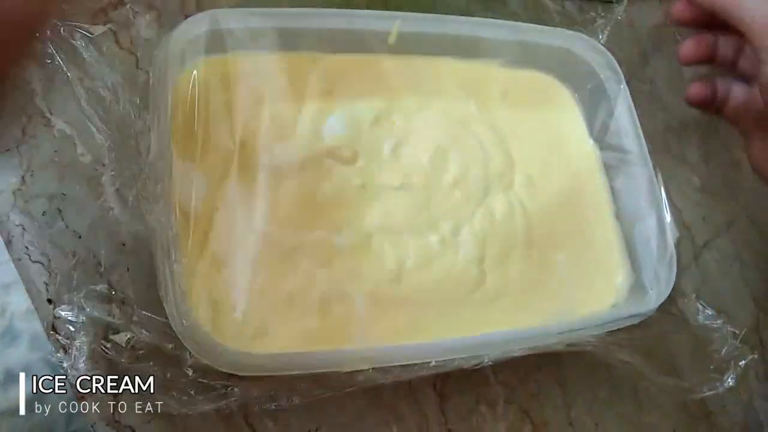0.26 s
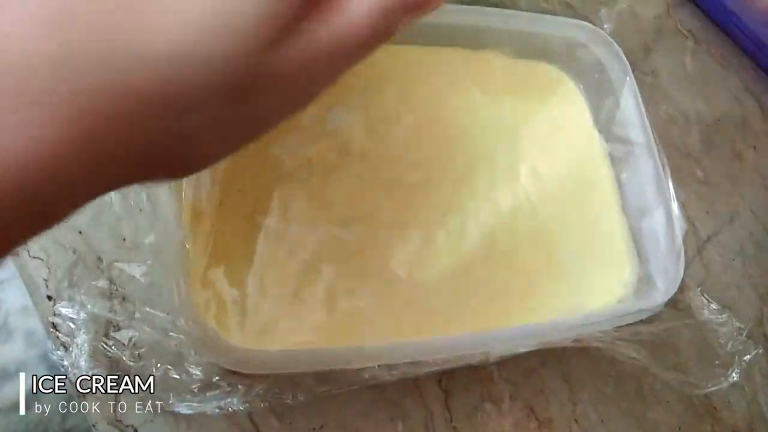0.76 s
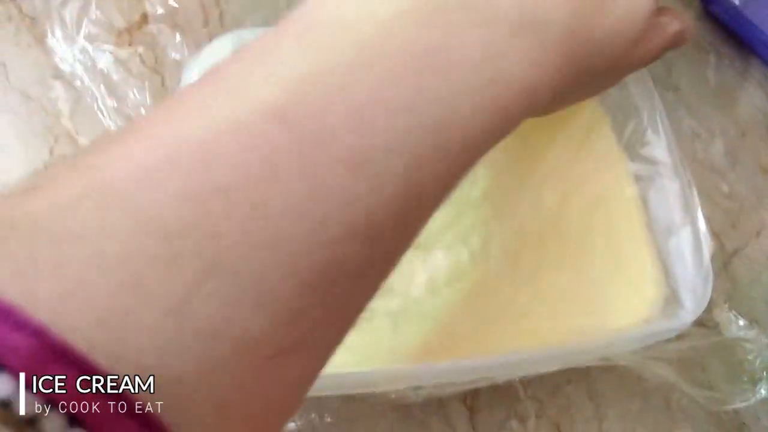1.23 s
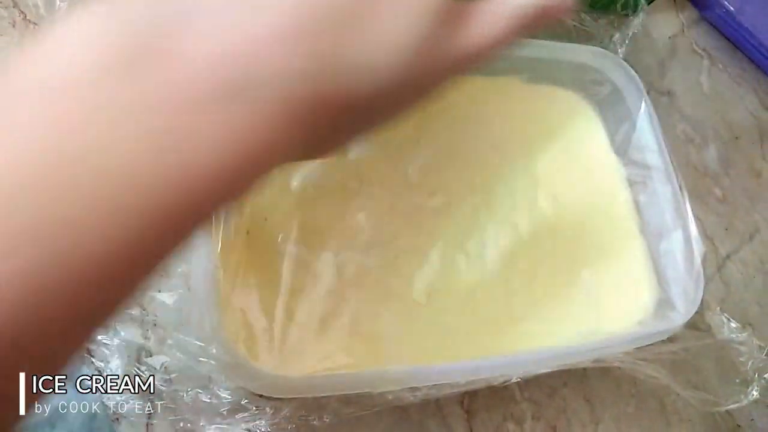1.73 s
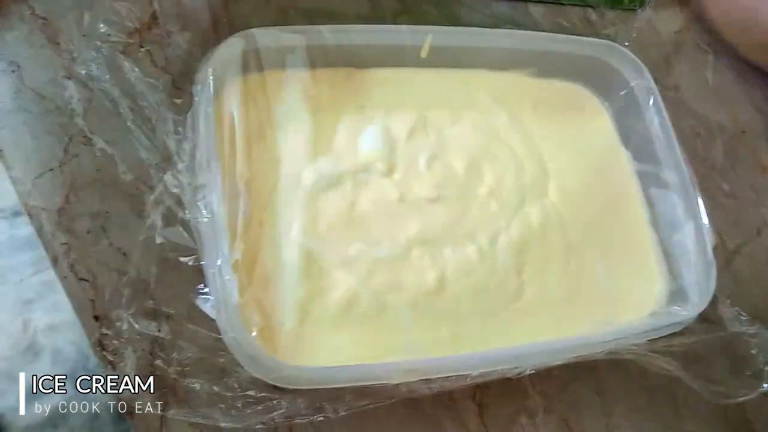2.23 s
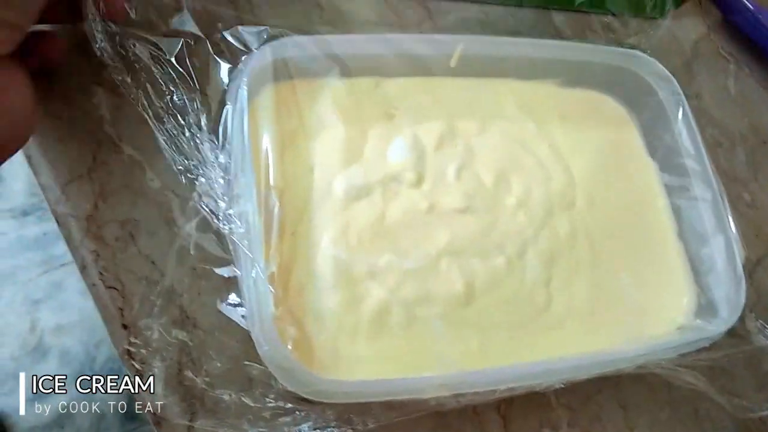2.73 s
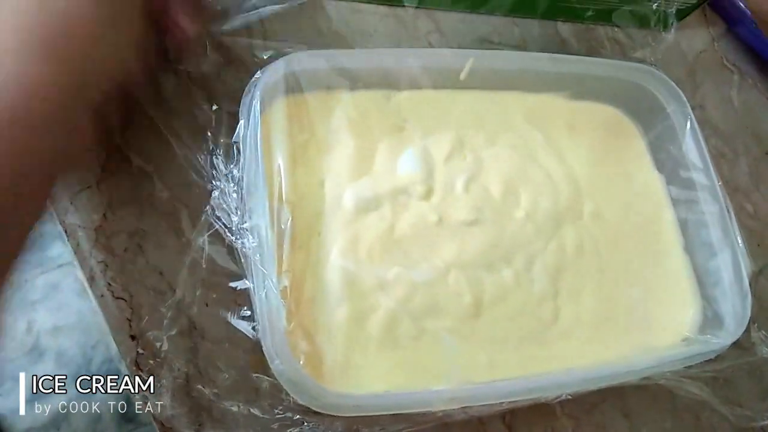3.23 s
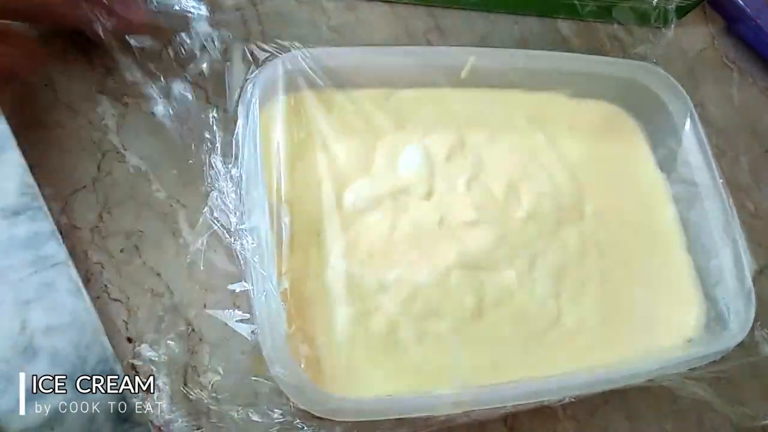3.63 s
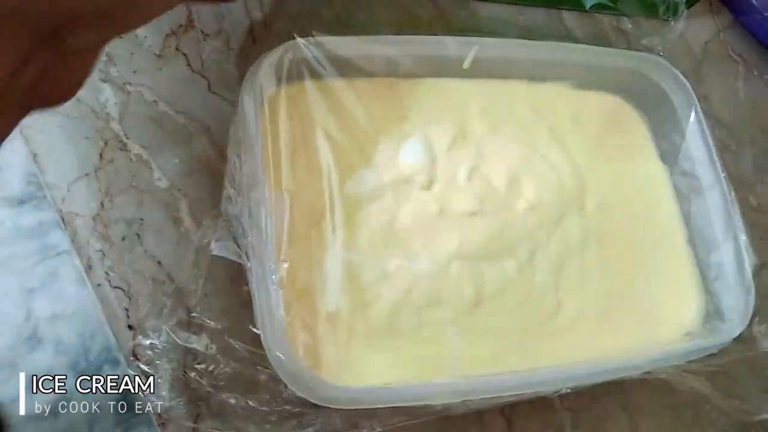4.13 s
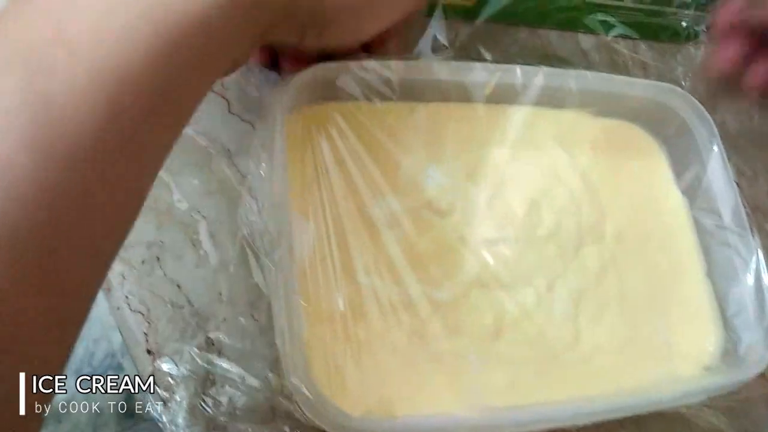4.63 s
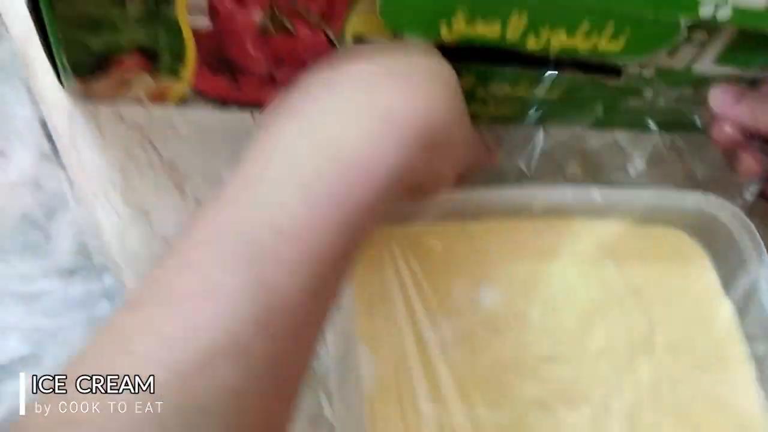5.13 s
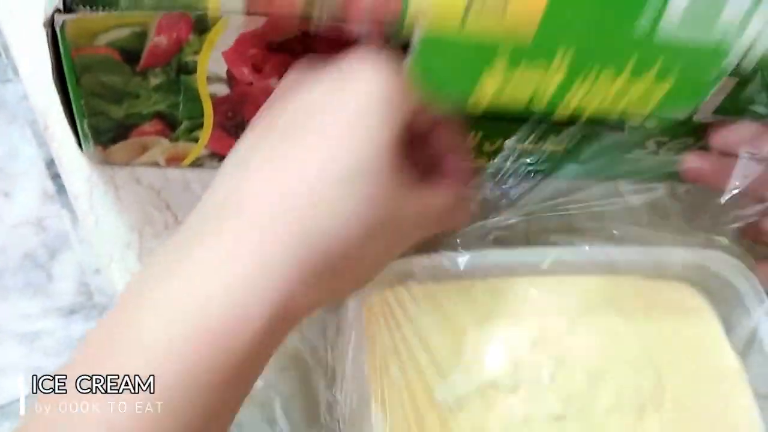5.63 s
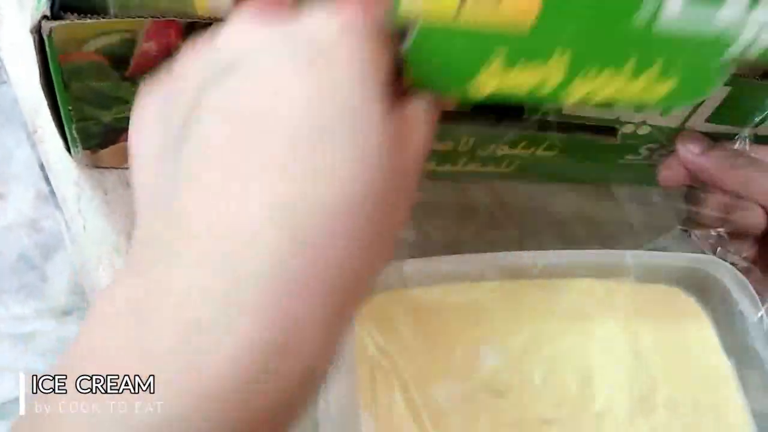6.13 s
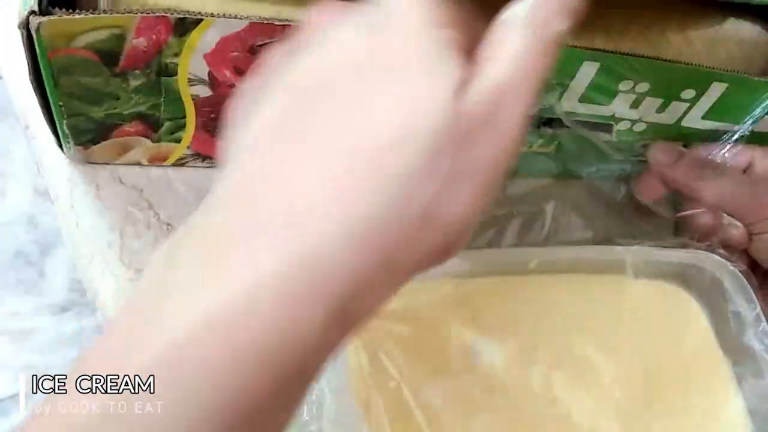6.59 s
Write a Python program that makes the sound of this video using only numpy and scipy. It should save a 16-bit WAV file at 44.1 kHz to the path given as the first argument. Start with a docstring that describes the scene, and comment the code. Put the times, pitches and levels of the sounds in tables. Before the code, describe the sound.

A close microphone in a small, hard kitchen, over faint steady air noise. Small film rustles at 0.2 seconds, then near quiet until a soft bump and tap on a plastic tub's rim at 0.9. Light bumps and crumples around 1.25 to 1.4 lead into a long pull from 1.55 to 2.45: a stuttering, drum-like stretch around one kilohertz, wavering in pitch, with pops. A tub tap and crumple at 2.65, faint tugs, then sharp bright snaps at 3.4 and a jolting pop at 3.84. Another pull runs from 4.07 to 4.5, with dull double bumps at 4.77. Snaps and stretching return from 5.3 to 5.75. The busiest, loudest crackling comes at 6.0 to 6.12, ending in a low pop and hollow cardboard knock. A further pull with thin squeaks follows until 6.6, and a brief strong tug at 6.8.

```python
"""Cling film is pulled off its roll and stretched over a plastic tub on a stone kitchen counter.
Stick-slip makes the peeling film let go in tiny slips, which excite the taut sheet like a drum and fizz in
its creases. Folds snap and crumple as filtered impulses and noise; the film squeaks by friction.
Bumps, taps and a knock ring decaying modes of tub, counter and cardboard box.
A small hard room answers with decaying random reflections, over faint steady air noise."""
import sys
import numpy as np
from scipy import signal
from scipy.fft import rfft, irfft
from scipy.io import wavfile

SR = 44100
rng = np.random.default_rng(int(sys.argv[2]) if len(sys.argv) > 2 else 0)


def to_wav(sig):
    """Store sig (one row per channel, or 1-D mono) as 16-bit WAV at the path in sys.argv[1].

    Samples outside -1..1 are clipped; the rate is SR.
    """
    pcm = np.clip(np.atleast_2d(sig), -1, 1) * 32767
    pcm = np.round(pcm).astype(np.int16)
    wavfile.write(sys.argv[1], SR, pcm.T)  # frames by channels


N = 302526
TIME = np.arange(N) / SR
# Levels in the tables are relative: the functions that play them add their own mixing gains.

COARSE_DB, FINE_DB = -3.5, 0.5   # large and small creases, against the creases' level
SHEET_DB, BOX_DB = -0.47, -2   # gain of the sheet and of the box around the roll
# spectrum of large creases: hz, density_db
LARGE_CREASE_COLOUR = [(1000, -13.5), (2200, 6.5), (2800, -1.5), (3800, -4), (5200, 5), (6400, -12.5),
                       (7500, 2.5), (10000, -34)]
# spectrum of small creases: hz, density_db
SMALL_CREASE_COLOUR = [(3000, -38), (5500, -9), (7000, -5), (9200, -1), (11000, -6), (14000, -7.5),
                       (16000, -34)]
# spectrum of the hollow box and tub: hz, density_db
HOLLOW_COLOUR = [(40, -7), (70, -2.5), (120, -16), (163, -2), (195, -30.5), (250, -3), (300, 3), (365, -24),
                 (430, -8.5), (550, -8), (700, -37), (1500, -31)]


def peeling():
    """Stick-slip friction: the same uneven grip drives the sheet, its creases and the box around the roll."""
    grip_db = 1.34 * drift(130) + 3.0 * drift(35)
    sheet_gain, crease_gain, box_gain = pull_gain(axis=1), pull_gain(axis=2), pull_gain(axis=3)
    sheet = stretched_sheet() + singing()
    drum = sheet * sheet_gain * from_db(0.62 * grip_db + SHEET_DB)
    coarse = creases(LARGE_CREASE_COLOUR) * crease_gain * from_db(0.62 * grip_db + COARSE_DB)
    fine = creases(SMALL_CREASE_COLOUR) * crease_gain * from_db(0.5 * grip_db + FINE_DB)
    box_force = slips(per_s=900, spread_db=4.0) * box_gain * from_db(0.69 * grip_db + BOX_DB)
    # too light a force to shake the counter
    bass_cut = signal.butter(1, 110, "high", fs=SR, output="sos")
    box = signal.sosfilt(bass_cut, colour(box_force, HOLLOW_COLOUR))
    return drum + coarse + fine + box


GRAB_S, LET_GO_S = 0.0042, 0.013   # a pull starts quickly and is let go more slowly
TUG_ARCH_DB, TUG_FIZZ_ARCH_DB = 2, 7.0   # rise to halfway through a tug: of the sheet, of its creases
TUG_BOX_DB = -15.0   # the box in a tug, against the sheet
# long pulls of film off the roll, each a curve of points: time_s, sheet_db, creases_db, box_db
PULL_CURVES = [
    [(1.55, -45.5, -70, -48.5), (1.624, -46.5, -58, -52), (1.642, -41, -57, -45), (1.824, -44, -56, -60),
     (1.878, -41, -52.5, -49.5), (2.13, -44, -60.5, -47), (2.294, -38.5, -59, -53),
     (2.448, -50.5, -64, -61), (2.47, -78, -106, -73)],
    [(4.07, -45.5, -65, -56.5), (4.13, -42.5, -59, -49.5), (4.172, -48.5, -59, -63), (4.194, -52, -55, -50),
     (4.2, -34.5, -51.5, -63), (4.25, -68, -55.5, -57), (4.28, -44, -60.5, -45.5),
     (4.428, -51.5, -56.5, -64), (4.55, -64.5, -66.5, -73)],
    [(5.35, -64, -58, -65), (5.366, -57, -54, -72), (5.524, -61, -54.5, -74), (5.55, -61, -51, -91),
     (5.602, -38, -46.5, -56), (5.648, -46.5, -52.5, -68), (5.7, -61.5, -57, -78), (5.762, -63, -56, -76),
     (5.77, -62, -54.5, -64)],
    [(6.17, -54, -62.5, -55), (6.264, -55, -55, -73), (6.322, -49, -54.5, -72), (6.342, -53.5, -58, -43),
     (6.356, -44, -52, -63), (6.374, -52, -50, -78), (6.414, -67, -64, -71), (6.426, -58, -54, -67),
     (6.44, -62, -83, -78)],
]
# short tugs at the film: start_s, length_s, sheet_db, creases_db
SHORT_TUGS = [(2.849, 0.095, -76, -80), (3.036, 0.057, -55, -73.5), (3.113, 0.25, -61.5, -74),
              (3.499, 0.082, -66.5, -79), (3.693, 0.27, -67, -60.5), (3.871, 0.11, -60, -67),
              (4.571, 0.21, -59.5, -59), (4.99, 0.088, -58, -60), (5.188, 0.12, -66, -68),
              (5.789, 0.089, -47.5, -54), (5.905, 0.26, -56.5, -55.5), (6.501, .14, -53.5, -62),
              (6.786, 0.1, -35.5, -53)]


def pull_gain(axis):
    """Force envelope of sheet (1), creases (2) or box (3): pulls follow their curves, tugs an arch."""
    pulls = [np.array(pull) for pull in PULL_CURVES]
    arch = np.array([-0.5, 0.5, -0.5])
    for s, length, sheet_db, creases_db in SHORT_TUGS:
        times = s + length * np.array([0, 0.5, 1])
        sheet = sheet_db + TUG_ARCH_DB * arch
        folds = creases_db + TUG_FIZZ_ARCH_DB * arch
        pulls.append(np.transpose([times, sheet, folds, sheet + TUG_BOX_DB]))
    out = np.zeros(N)
    for pull in pulls:
        # distance before the start or after the end, in time constants
        outside = np.maximum((pull[0, 0] - TIME) / GRAB_S, (TIME - pull[-1, 0]) / LET_GO_S)
        near = outside < 10
        level = from_db(np.interp(TIME[near], pull[:, 0], pull[:, axis]))
        out[near] = np.maximum(out[near], level * np.exp(-np.maximum(outside[near], 0)))
    return out


SHEET_HZ = 1100   # usual pitch of the sheet, to which its spectrum and modes refer
SLACK_HZ, TAUT_HZ, TIGHTEN_S = 975.6, 1201, 0.18


def tension():
    """Tension raises pitch: slack at each new grip, the sheet tightens exponentially."""
    grips = np.sort([0] + [pull[0][0] for pull in PULL_CURVES] + [tug[0] for tug in SHORT_TUGS])
    held = TIME - grips[np.searchsorted(grips, TIME, "right") - 1]
    pitch_hz = TAUT_HZ + (SLACK_HZ - TAUT_HZ) * np.exp(-held / TIGHTEN_S)
    return pitch_hz / SHEET_HZ


# spectrum of the taut sheet at its usual pitch: hz, density_db
SHEET_COLOUR = [(60, -56), (200, -42.5), (400, -16), (600, -16), (800, -1), (1030, 3.5), (1250, 4),
                (1450, -11.5), (1600, -4), (1950, -15), (2300, -22), (2750, -20.5), (3600, -30.5),
                (6000, -71)]


def sheet_at(pitch_hz):
    """Tension scaling: the whole spectrum of the sheet shifts with its pitch."""
    return np.array(SHEET_COLOUR) * [pitch_hz / SHEET_HZ, 1]


# drum modes of the stretched sheet at its usual pitch: hz, level_db, t60_s
DRUM_MODES = [(568.2, -0.5, 0.15), (675.7, -2, 0.17), (855, -57, 0.17), (894, 0, 0.066), (1034, 6, 0.19),
              (1194, -3, 0.37), (1310, -15, 0.12), (1496, -7.5, 0.48), (1578, -31, 0.11)]


def stretched_sheet():
    """Membrane resonance: slips drum on the sheet, whose resonances all glide with its tension."""
    drive = slips(per_s=2500, spread_db=1.0)
    modes = from_db(-8.0) * rms_one(ring(drive, DRUM_MODES))
    drum = rms_one(colour(drive, SHEET_COLOUR) + modes)
    return np.interp(np.cumsum(tension()) % N, np.arange(N), drum)


SING_S, SING_DB, SING_GLIDE = 0.14, -0.5, 0.069   # note length, level against its mode, most relative bend


def singing(count=70):
    """Mode locking: at random moments slips lock onto one sheet mode and give a brief wavering note."""
    out = np.zeros(N)
    pitch = tension() * (1 + 0.031 * drift(276))
    t = np.linspace(0, 1, int(SING_S * SR))   # share of the note
    for when, which, bend in rng.random((count, 3)):
        start = int(when * (N - len(t)))
        hz, db, t60 = DRUM_MODES[int(which * len(DRUM_MODES))]
        bend_factor = 1 + SING_GLIDE * (2 * bend - 1) * t
        note_hz = hz * pitch[start:start + len(t)] * bend_factor
        wave = np.sin(2 * np.pi * np.cumsum(note_hz) / SR)
        add(out, start / SR, from_db(db + SING_DB) * np.hanning(len(t)) * wave)
    return out


def creases(spectrum, wander=0.054):
    """Impulsive buckling: tiny flips and a few larger ticks, whose colour wanders as folds change size."""
    tiny = from_db(-4.0) * slips(per_s=11000, spread_db=5.5)
    ticks = from_db(-10.5) * slips(per_s=320, spread_db=5.0)
    speed = 1 + wander * drift(13)
    return glide(colour(tiny + ticks, spectrum), speed)


SNAP_SWELL_S, SNAP_DECAY_S = 0.0004, 0.0014   # flutter of a snap
# single creases snapping: start_s, peak_db, sheet_jolt_db
CREASE_SNAPS = [(0.2632, -42.5, -64), (2.8565, -52.5, -84), (2.8815, -54.5, -83), (2.9134, -55, -65),
                (3.1306, -50.5, -64), (3.3242, -39.5, -38), (3.3679, -38, -29), (3.382, -21, -29),
                (3.4491, -27, -29), (3.7796, -42, -54), (3.8373, -28, -16), (4.1937, -33.5, -42),
                (4.2253, -30.5, -40), (4.2388, -34, -45), (4.2744, -43, -34), (4.4121, -36.5, -37),
                (4.6417, -32, -50), (4.7333, -35, -54), (5.0152, -41, -63), (5.0621, -37.5, -36),
                (5.2081, -45, -50), (5.334, -25.5, -31.5), (5.7382, -38, -56), (5.7845, -41, -48),
                (5.8482, -36.5, -37), (5.9999, -28.5, -34), (6.006, -25.5, -35), (6.11, -26, -33),
                (6.5275, -39, -35.5)]
# spectrum of a snapping crease: hz, density_db
SNAP_COLOUR = [(1000, -60), (2200, -3), (2700, 2.5), (3800, -4.5), (5200, 1.5), (7000, 3), (9200, 6),
               (11000, 2.5), (14000, -2.5), (16000, -11.5)]


def snaps():
    """Snap-through buckling: a crease flips with one sharp spike, flutters briefly and jolts the sheet."""
    s, peak_db, sheet_db = np.transpose(CREASE_SNAPS)
    swell, decay = np.full(len(s), SNAP_SWELL_S), np.full(len(s), SNAP_DECAY_S)
    crest = s + 0.0013
    crack_flutter = rng.standard_normal(N) * bursts(crest, peak_db - 14.0, swell, decay)
    crack = blows(zip(crest, peak_db + 10.0)) + crack_flutter
    jolt_flutter = rng.standard_normal(N) * bursts(crest, sheet_db - 4.0, swell, decay)
    jolt = blows(zip(crest, sheet_db + 0.5)) + jolt_flutter
    return colour(crack, SNAP_COLOUR) + colour(jolt, SHEET_COLOUR)


# plucks of the taut sheet: start_s, peak_db, pitch_hz
SHEET_PLUCKS = [(1.388, -33, 1244), (1.671, -27, 1020), (2.214, -23, 1223), (2.297, -21.5, 1033),
                (3.386, -24, 852), (3.836, -28, 930), (4.071, -30.5, 922), (4.2, -22.5, 1236),
                (4.306, -28, 1180), (4.563, -30, 930), (4.64, -30.5, 1217), (4.941, -36.5, 1116),
                (5.024, -32.5, 947), (5.243, -41, 1015), (5.621, -22, 1568), (5.784, -28.5, 1026),
                (5.985, -27.5, 1110), (6.013, -21, 1150), (6.12, -14, 796), (6.501, -30, 880.5),
                (6.612, -33.5, 803)]


def plucks(size=2048):
    """Free vibration: the taut sheet is let go and pops with a slap and a few cycles of its pitch."""
    out, t = np.zeros(N), TIME[:size]
    envelope = np.exp(-t / 0.0064) * (1 - np.exp(-t / 0.00012))
    for s, db, hz in SHEET_PLUCKS:
        slap = from_db(3.5) * colour(signal.unit_impulse(size), sheet_at(hz))
        tone = from_db(-7.0) * np.cos(2 * np.pi * hz * t) * envelope
        add(out, s, from_db(db) * (slap + tone))
    return out


CRUMPLE_SWELL_S = 0.0072
# handfuls of folds crumpling: peak_s, peak_db, fizz_db, pitch_hz, decay_s
FOLD_CRUMPLES = [(0.164, -47, -58, 1110, 0.029), (0.26, -40.5, -56.5, 1000, 0.0043),
                 (1.235, -47.5, -69, 1040, 0.02), (1.283, -43.5, -55, 980, 0.027),
                 (1.378, -42.5, -65, 1070, 0.021), (1.436, -50, -61.5, 1190, .01),
                 (1.542, -38, -65, 1130, .01), (1.674, -37, -62, 1010, 0.022),
                 (2.652, -33.5, -46, 1145, 0.011), (3.385, -29.5, -36, 955, 0.013),
                 (3.401, -27, -54, 1320, 0.0087), (3.45, -33.5, -39.5, 740, 0.014),
                 (3.839, -33.5, -49, 1160, 0.0066), (4.568, -33, -53.5, 973, 0.025),
                 (4.734, -35.5, -42.5, 1095, 0.0031), (5.786, -29, -39, 1100, .006),
                 (6.011, -18, -28.5, 1130, 0.0094)]


def crumples(size=8192):
    """Avalanche of slips: many folds give way in quick succession, each handful at its own pitch."""
    folds, out = slips(per_s=4900, spread_db=7.0), np.zeros(N)
    s, peak_db, fizz_db, pitch_hz, decay = np.transpose(FOLD_CRUMPLES)
    swell = np.full(len(s), CRUMPLE_SWELL_S)
    for k, start in enumerate(s - 0.05):   # room for the swell
        drive = folds * bursts([s[k]], [peak_db[k] - 5.5], [swell[k]], [decay[k]])
        add(out, start, colour(drive[int(start * SR):][:size], sheet_at(pitch_hz[k])))
    fizz = folds * bursts(s, fizz_db - 5.0, swell, decay)
    return out + colour(fizz, SNAP_COLOUR)


# squeaks of the film dragging over the roll: peak_s, level_db, swell_s, decay_s
FILM_SQUEAKS = [(5.115, -54, 0.0013, 0.0086), (5.61, -58, 0.04, 0.047), (6.02, -58, 0.01, 0.06),
                (6.35, -55, 0.042, 0.022), (6.553, -52, 0.0066, 0.0057), (6.595, -46.5, 0.0019, 0.016),
                (6.616, -66, 0.0057, 0.0061)]
# resonances of a squeak: hz, level_db, t60_s
SQUEAK_RESONANCES = [(2432, 5.5, 0.042), (3250, 6.5, 0.058), (3700, -1, 0.021), (5230, -6.5, 0.09),
                     (6840, -7, .015), (9060, 8.5, 0.012)]


def squeaks():
    """Friction excitation: noise of uneven strength drives a few narrow, high resonances."""
    friction = rng.standard_normal(N) * from_db(2.7 * drift(119.56))
    return rms_one(ring(friction, SQUEAK_RESONANCES)) * bursts(*np.transpose(FILM_SQUEAKS))


# soft bumps on tub and box: start_s, peak_db, counter_boom_db, contact_s (limited to 0.0004-0.01 s)
SOFT_BUMPS = [(0.164, -52.5, -74, 0.001), (0.911, -32, -51, 0.0039), (1.229, -40.5, -53, 0.0031),
              (1.27, -28.5, -47, 0.0011), (2.633, -39, -60, 0.00041), (2.687, -30.5, -50, 0.0058),
              (3.047, -54, -81, 0.00048), (3.191, -45, -53.5, 0.0003), (3.382, -40.5, -69, .001),
              (3.448, -43, -63, 0.0005), (4.274, -43.5, -78, 0.00068), (4.76, -29, -59, 0.0038),
              (4.772, -26, -44.5, 0.0032), (5.239, -51, -86, 0.00071), (5.781, -43.5, -67, 0.0011),
              (5.939, -44, -76, 0.0034), (5.977, -33, -50, 0.0015), (6.007, -23, -43, 0.0037),
              (6.113, -33, -44, 0.0036), (6.122, -30, -44, 0.00047), (6.499, -44.5, -72, 0.0024),
              (6.522, -38.5, -54, 0.0044), (6.61, -36.5, -55, 0.0045), (6.789, -45, -56, 0.0015)]
# modes of the tub: hz, level_db, t60_s
TUB_MODES = [(116.8, -9.5, 0.27), (150.7, 3.5, 0.075), (256, -4, 0.12), (282.3, -8.5, 0.18),
             (311.5, -5, 0.19), (412.5, -1, 0.087), (450, -11, 0.26)]
# modes of the deep boom of the counter: hz, level_db, t60_s
COUNTER_MODES = [(51.8, -5, 0.49), (68, 6.5, 0.23), (84.5, -44, 0.044)]


def bumps():
    """Contact-time filtering: a longer contact leaves only low tub modes; the counter booms beneath."""
    push = np.zeros(N)
    for s, db, boom_db, contact in SOFT_BUMPS:
        t = TIME[:SR // 50] / np.clip(contact, 0.0004, 0.01)
        pulse = np.sin(np.pi * np.minimum(t, 1)) ** 2
        add(push, s, from_db(db) * pulse / pulse.sum())
    boom = ring(blows([(s, boom_db) for s, db, boom_db, contact in SOFT_BUMPS]), COUNTER_MODES)
    tub = from_db(-5.0) * ring(push, TUB_MODES)
    hollow = from_db(22.5) * colour(push, HOLLOW_COLOUR)
    return tub + hollow + from_db(1.0) * boom


# fingers tap and brush the tub's rim: start_s, peak_db, swell_s, decay_s
RIM_TAPS = [(0.795, -52.5, 0.0082, 0.011), (0.9096, -29.5, 0.0035, 0.0066), (2.6408, -36.5, 0.004, 0.021),
            (3.1928, -48, 0.0047, 0.0041)]
# modes of the rim: hz, level_db, t60_s
RIM_MODES = [(1003, -3.5, 0.21), (1010, -22, 0.33), (1180, -10, 0.067), (1400, -33, 0.19),
             (1620, -9, 0.087), (1570, -12, 0.35), (1980, -12, 0.33), (1990, -14, 0.34), (2090, -6, 0.13),
             (2340, -15.5, 0.19)]
# spectrum of a finger chattering on the rim: hz, density_db
RIM_CONTACT_COLOUR = [(150, -11.5), (500, -8.5), (800, -16.5), (1100, 1), (1350, -10), (1650, -0.5),
                      (2100, -7.5), (2450, -23), (4500, -38), (12000, -52.5)]


def rim_taps():
    """Contact noise and modal ringing: fingers chatter on the tub's rim, and each touch sets it ringing."""
    s, peak_db, swell, decay = np.transpose(RIM_TAPS)
    envelope = bursts(s + 0.0015, peak_db, np.maximum(swell, 0.0005), np.maximum(decay, 0.001))
    chatter = colour(rng.standard_normal(N) * envelope, RIM_CONTACT_COLOUR)
    return from_db(-0.5) * chatter + from_db(-9.5) * ring(blows(RIM_TAPS), RIM_MODES)


# knocks on the cardboard box: start_s, peak_db
BOX_KNOCKS = [(6.121, -27)]
# modes of the box: hz, level_db, t60_s
BOX_MODES = [(803, -4, 0.041), (748, -3, 0.086), (1240, 8, 0.014), (1917, -22.5, 0.15)]


def box_knocks():
    """Modal ringing: an impulse sets the damped modes of the hollow box sounding."""
    return from_db(5.5) * ring(blows(BOX_KNOCKS), BOX_MODES)


# reverberation of the kitchen: hz, t60_s, echo_db
KITCHEN_DECAY = [(152, 0.47, -13), (490, 0.38, -5.5), (1110, 0.41, -11.5), (2150, 0.31, -7),
                 (4870, 0.17, -12), (12000, 0.17, -11)]


def kitchen(x):
    """Reverberation: near surfaces scatter the treble at once; the walls ring on, band by band."""
    response = 0
    for low in 110 * 2.0 ** np.arange(8):   # octave bands
        band = signal.butter(2, [low, min(2 * low, 0.45 * SR)], "band", fs=SR, output="sos")
        hz = low * np.sqrt(2)
        level = from_db(at_hz(KITCHEN_DECAY, hz, axis=2))
        tail = echoes(at_hz(KITCHEN_DECAY, hz), onset=0.011) * level
        response = response + signal.sosfilt(band, tail)
    bright = signal.sosfilt(signal.butter(2, 1300, "high", fs=SR, output="sos"), x)
    return x + through(x, response) + from_db(-0.5) * scatter(bright, t60=0.032)


def scatter(x, t60, count=5):
    """Early scattering off hands, box and counter: several paths share the sound in drifting proportions."""
    shares = np.array([drift(30) for _ in range(count)])
    shares /= np.linalg.norm(shares, axis=0)
    return sum(through(x * share, echoes(t60, onset=0.00024)[:SR // 10]) for share in shares)


def echoes(t60, onset):
    """Diffuse field: dense random reflections build up and decay exponentially; unit energy."""
    t = TIME[:SR // 2]
    tail = rng.standard_normal(len(t)) * from_db(-60 * t / t60) * (1 - np.exp(-t / onset))
    return tail / np.linalg.norm(tail)


AIR_DB = -69   # level of the steady noise
# spectrum of the background air noise: hz, density_db
AIR_COLOUR = [(15, -54), (25, -2), (147, -9.5), (225, -16.5), (425, -10), (539, -12), (616, -6), (722, -16),
              (846, -11.5), (966, -3), (1070, -15), (1470, -11), (2570, -23), (3830, -27), (14000, -31.5)]


def air():
    """Stationary noise: a faint, steady background with a fixed spectrum."""
    return from_db(AIR_DB) * colour(rng.standard_normal(N), AIR_COLOUR)


def slips(per_s, spread_db):
    """Poisson-like impulses: tiny releases at random moments, many small and a few large; unit power."""
    sizes = from_db(spread_db * np.minimum(rng.exponential(1, N), 4))
    signs = rng.choice([-1, 1], N)
    return rms_one(sizes * signs * (rng.random(N) < per_s / SR))


def blows(rows):
    """Impulse excitation: one click for each row that begins with a time in s and a level in dB."""
    out = np.zeros(N)
    for s, db, *rest in rows:
        out[int(s * SR)] += from_db(db)
    return out


def bursts(times, levels_db, swells, decays):
    """Exponential envelopes: each burst swells to a peak and dies away."""
    out = np.zeros(N)
    for s, db, swell, decay in zip(times, levels_db, swells, decays):
        near = slice(max(int((s - 10 * swell) * SR), 0), int((s + 10 * decay) * SR))
        t = TIME[near] - s
        out[near] += from_db(db) * np.exp(np.minimum(t / swell, -t / decay))
    return out


def ring(drive, modes):
    """Modal synthesis: a drive sets decaying sines ringing, with alternating signs."""
    out = np.zeros(N)
    for k, (hz, db, t60) in enumerate(modes):
        r = from_db(-60 / (t60 * SR))   # decay per sample
        w = 2 * np.pi * hz / SR
        resonance = signal.lfilter([0, np.sin(w)], [1, -2 * r * np.cos(w), r * r], drive + 1e-18)
        out += (-1) ** k * from_db(db) * resonance
    return out


def colour(x, spectrum, size=8192):
    """Minimum-phase filtering: a causal filter of the given spectrum; white noise keeps its power."""
    hz = np.arange(size // 2 + 1) * SR / size
    cepstrum = irfft(np.log(from_db(at_hz(spectrum, hz))))
    # folding the cepstrum makes the response causal
    cepstrum[1:size // 2] *= 2
    cepstrum[size // 2 + 1:] = 0
    response = irfft(np.exp(rfft(cepstrum)))
    return through(x, response / np.linalg.norm(response))


def through(x, response):
    """Convolution: pass a signal through an impulse response."""
    return signal.fftconvolve(x, response)[:len(x)]


def glide(x, speed, order=4):
    """Variable-speed reading: shift all pitches of a sound by a changing factor."""
    fine = signal.resample_poly(x, order, 1)
    return np.interp(order * (np.cumsum(speed) % N), np.arange(len(fine)), fine)


def drift(rate):
    """Random modulation: straight lines between Gaussian values drawn at the given rate per second."""
    knots = rng.standard_normal(N)
    return np.interp(TIME * rate, np.arange(N), knots)


def add(out, s, sound):
    """Superposition: mix a short sound in at a given time."""
    start = int(s * SR)
    out[start:start + len(sound)] += sound[:N - start]


def at_hz(points, hz, axis=1):
    """Logarithmic frequency scale: read a column of a table along it."""
    points = np.array(points)
    return np.interp(np.log(hz + 1e-3), np.log(points[:, 0]), points[:, axis])


def from_db(db):
    """Level definition: decibels to amplitude gain."""
    return 10 ** (np.asarray(db) / 20)


def rms_one(x):
    """Power normalisation: scale to unit mean square."""
    return x / np.sqrt(np.mean(x ** 2) + 1e-20)


def scene():
    """Mid-side stereo: all sources lie straight ahead; scattered treble spreads between the sides."""
    film = peeling() + snaps() + plucks() + crumples() + squeaks()
    hands = bumps() + rim_taps() + box_knocks()
    mid = from_db(-2.5) * kitchen(film + hands) + air()
    treble = signal.sosfilt(signal.butter(6, 5000, "high", fs=SR, output="sos"), mid)
    side = from_db(-9.0) * scatter(treble, t60=0.0088, count=6)
    return np.array([mid + side, mid - side])


CUTOFF_HZ = 14350


def record(dry):
    """Band limiting: the microphone loses the deepest bass; the top is cut steeply."""
    thin = signal.sosfilt(signal.butter(4, 36, "high", fs=SR, output="sos"), dry)
    top_cut = signal.ellip(10, 0.2, 70, CUTOFF_HZ, fs=SR, output="sos")
    return signal.sosfilt(top_cut, thin)


dry = scene()
out = record(dry)
to_wav(out)
```